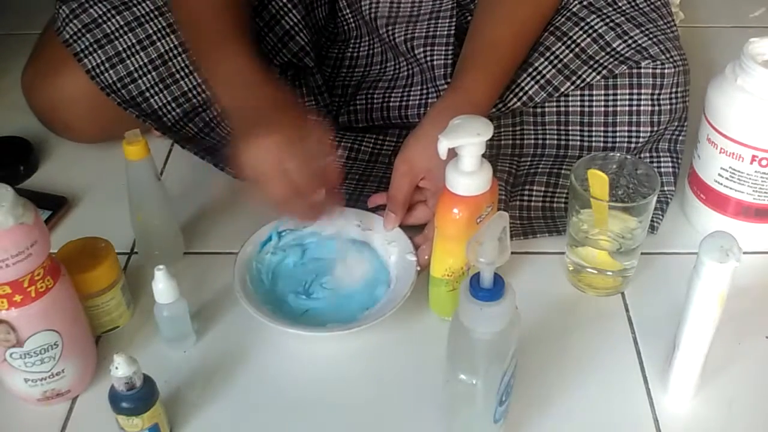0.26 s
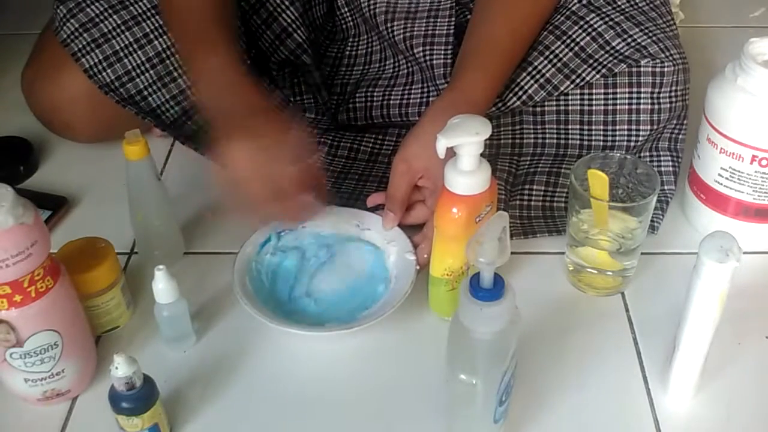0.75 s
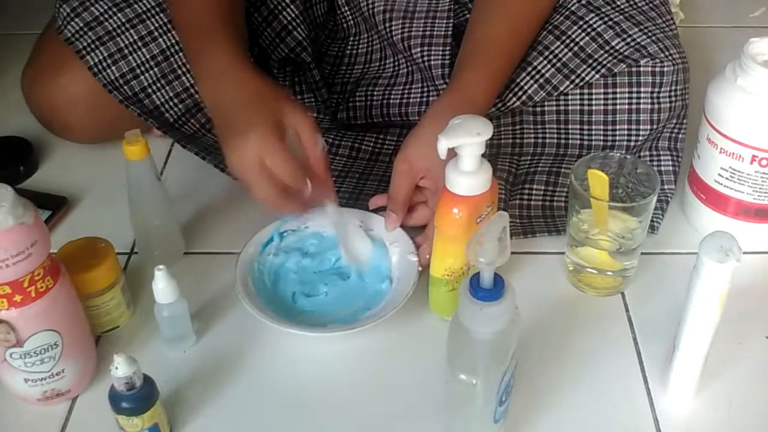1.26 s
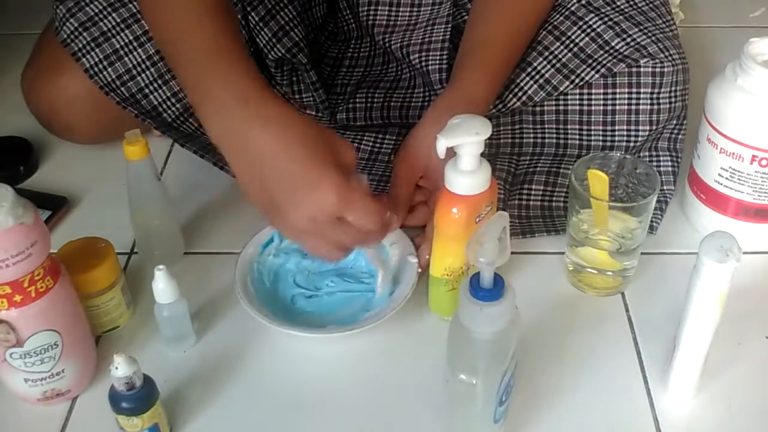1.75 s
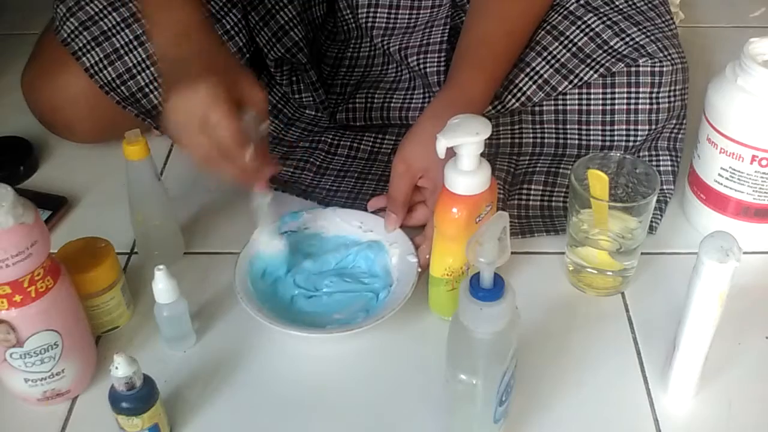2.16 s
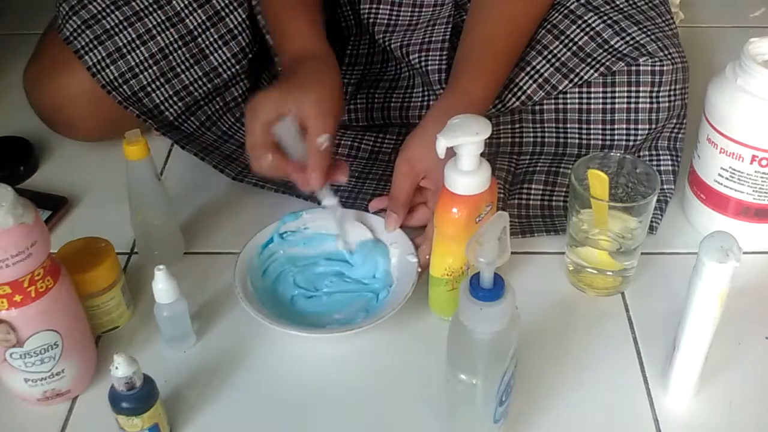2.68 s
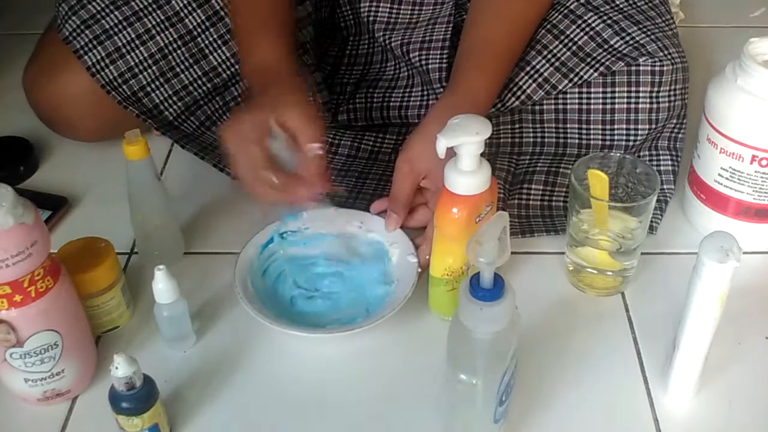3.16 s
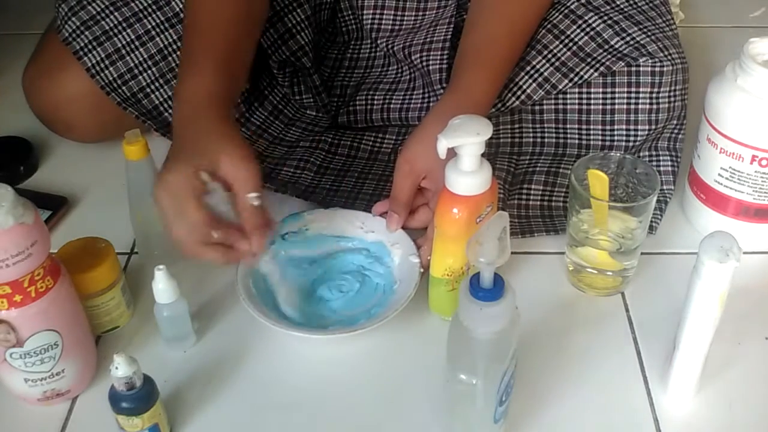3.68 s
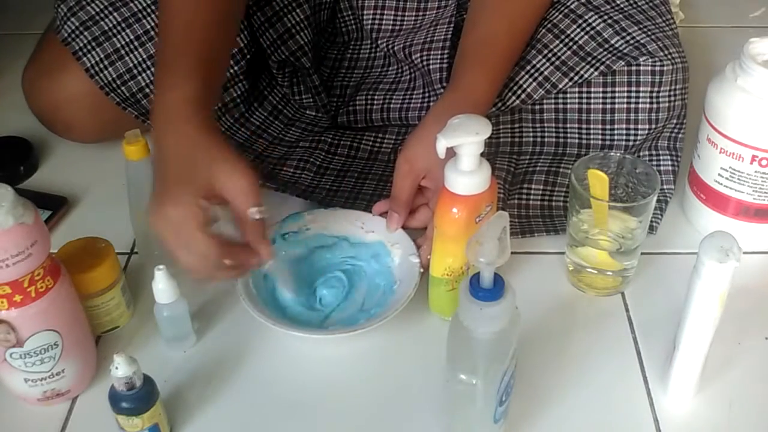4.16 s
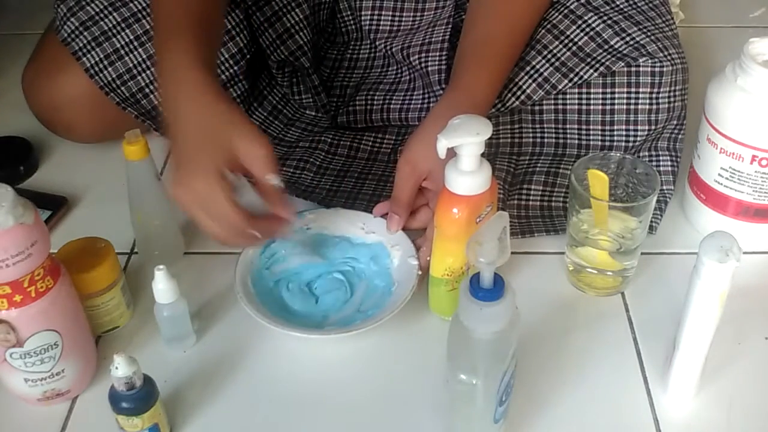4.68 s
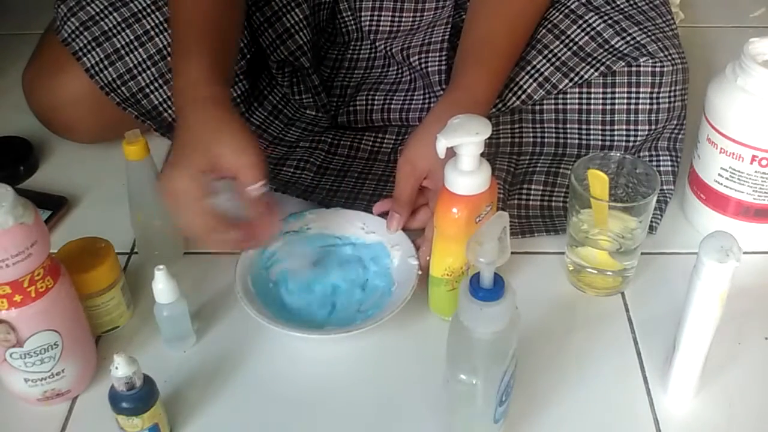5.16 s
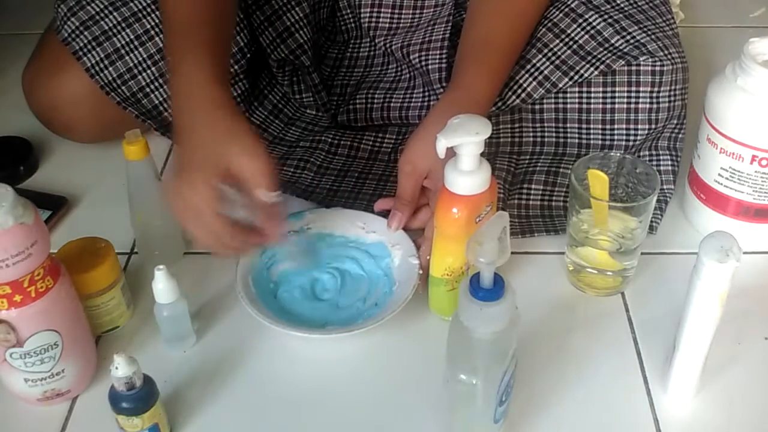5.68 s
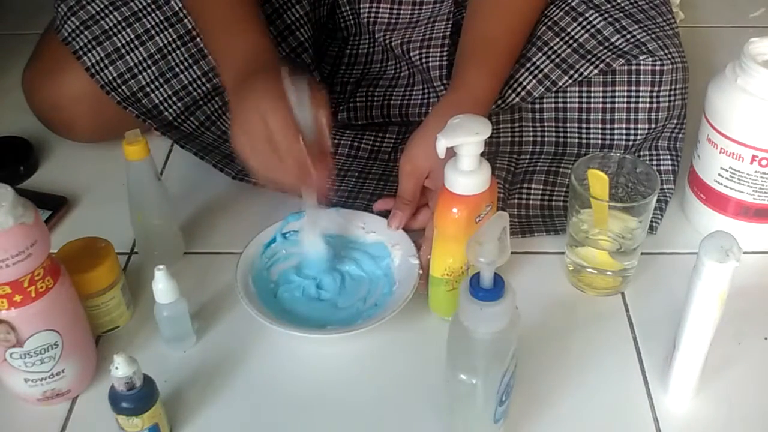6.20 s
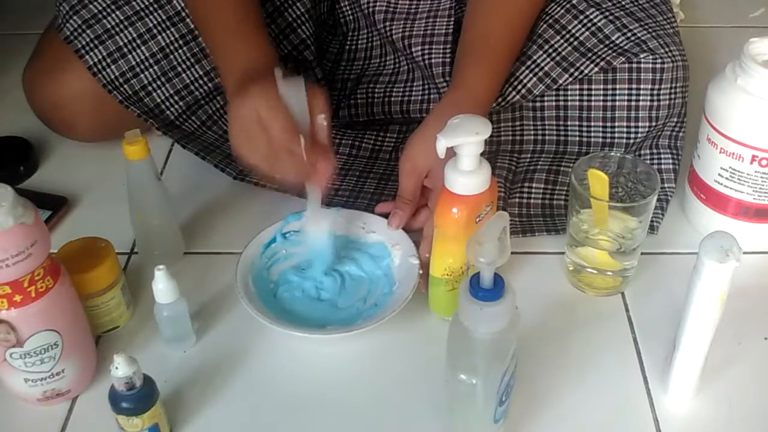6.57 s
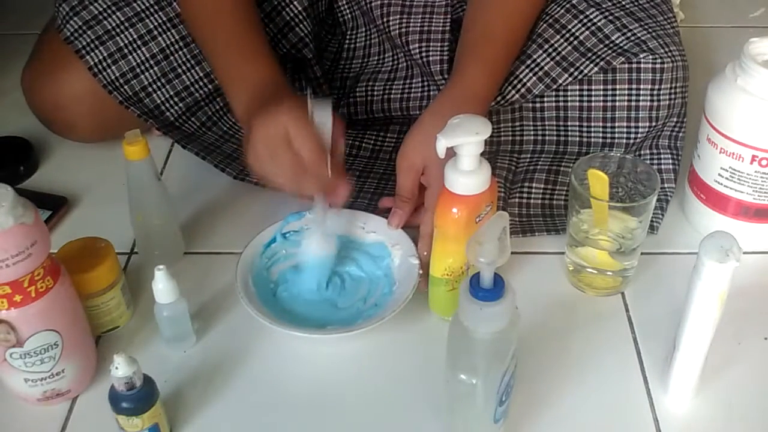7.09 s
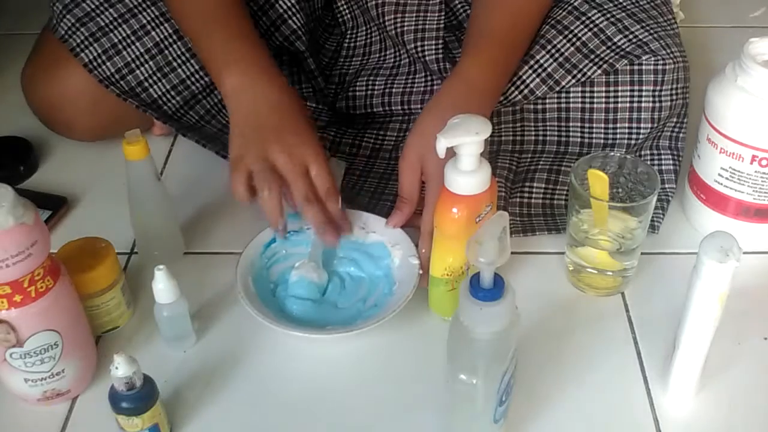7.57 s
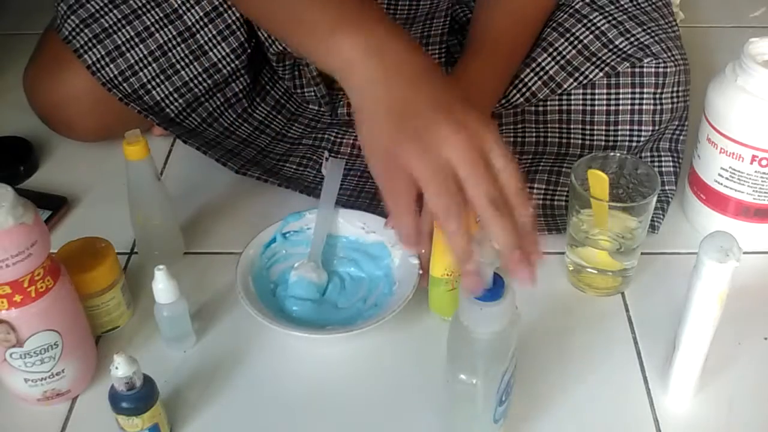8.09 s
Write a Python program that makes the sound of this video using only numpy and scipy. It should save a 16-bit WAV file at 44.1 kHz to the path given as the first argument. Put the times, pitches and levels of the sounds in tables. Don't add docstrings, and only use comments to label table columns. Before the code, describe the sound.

A plastic spoon stirs thick slime in a small ceramic-sounding bowl on a tiled floor, close to the microphone in a bare, lightly echoing room. From 0 to 0.8 s sharp, bright knocks come irregularly, the loudest at 0.3 s with a thin high ping, over sticky crackling. Faint ticks, a soft bump and quiet rubbing follow until 2.6 s, when three clear knocks ring out up to 3.1 s. Then mostly faint taps and wet drags, with one moderate knock at 4.8 s. From 5.35 to 6.7 s short, dry clacks repeat evenly, about five per second, with slight smacking. A weak tap and bump fall at 7 s, then dull floor bumps at 7.6, 7.7 and 8.1 s. Throughout, distant traffic murmurs, low engine throbs swell and fade, and hiss drifts; a faint motor passes and slows between 2 and 5.5 s.

```python
import sys
import numpy as np
from scipy import signal
from scipy.fft import rfft, irfft
from scipy.io import wavfile

SR = 44100
rng = np.random.default_rng(int(sys.argv[2]) if len(sys.argv) > 2 else 0)


def field_ratio(decibels):
    return 10 ** (np.asarray(decibels, dtype=float) / 20)


def generate_wav(signal):
    frames = np.transpose(np.atleast_2d(signal))
    scaled = np.clip(frames, -1, 1) * 32767
    pcm = np.round(scaled).astype(np.int16)
    wavfile.write(sys.argv[1], SR, pcm)


N = 367794
LEAD = SR // 4


# start in seconds, click, wall, rim and crack levels in dB.
WALL_KNOCKS = [(0.0712, -22.5, -27, -24.5, -31.5), (0.3123, -13, -20.5, -14, -16.5),
               (0.5274, -45.5, -29.5, -28, -31), (0.5326, -19.5, -55, -54, -39),
               (0.6586, -31.5, -34, -37.5, -59), (0.7492, -31.5, -37, -41.5, -77),
               (2.627, -26.5, -34.5, -37, -43), (2.8442, -52, -35.5, -34.5, -54.5),
               (2.853, -21, -31.5, -24, -30), (3.0768, -43.5, -45.5, -59, -75),
               (4.8378, -25.5, -33, -34, -42), (6.9646, -40, -50, -46, -45), (6.994, -48.5, -80, -54, -49)]
# click, wall, rim and crack levels in dB.
EARLIER_KNOCK_DB = (-29, -33.5, -34.5, -40.5)
# frequency in Hz, level in dB.
CLICK_SPECTRUM = [(700, -28.5), (1300, -11), (2000, 0.5), (2700, 4), (3300, -3), (4500, -22), (7000, -48)]
CRACK_SPECTRUM = [(2300, -23.5), (3300, 1.5), (4000, 5), (5000, 2.5), (6000, -0.5), (7200, -10.5),
                  (8500, -19.5), (12000, -38), (16000, -52)]
# frequency in Hz, level in dB, t60 in seconds.
BOTTOM_MODES = [(497, -10.5, 0.044), (672, -4, 0.06), (757, -3.5, 0.041), (869.5, -0.5, 0.042),
                (980, -2.5, 0.048), (1121, -3.5, .04)]
WALL_MODES = [(1260, -9, 0.052), (1398, -0.5, .035), (1553, 0, 0.029), (1700, -3, 0.049),
              (1760, -2.5, 0.052), (1870, -5, 0.043), (2068, -2.5, 0.033), (2284, -3, 0.017),
              (2745, -3.5, 0.021), (3080, -7, 0.0095)]
RIM_MODES = [(3497, 0, .055), (3570, -10, .03)]


def wall_knocks():
    earlier_s = -0.03
    bottom_at_db, bottom_follows = -42.5, 0.93
    rows = []
    for s, click_db, *rest_db in [(earlier_s, *EARLIER_KNOCK_DB), *WALL_KNOCKS]:
        bottom_db = bottom_at_db + bottom_follows * (click_db + 27)
        rows.append((s, click_db, bottom_db, *rest_db))
    return strike(rows, click=CLICK_SPECTRUM, bottom=BOTTOM_MODES, wall=WALL_MODES,
                  rim=RIM_MODES, crack=CRACK_SPECTRUM)


# start in seconds, click, bottom, wall and crack levels in dB.
BOTTOM_TAPS = [(3.5296, -60, -58.5, -63, -73.5), (4.5162, -58, -53, -58.5, -80.5),
               (5.3497, -38.5, -38.5, -39.5, -30.5), (5.53, -24.5, -32.5, -33.5, -20),
               (5.7198, -29.5, -35.5, -36, -20), (5.9126, -25, -38.5, -33.5, -16.5),
               (6.0915, -29.5, -35.5, -36.5, -21.5), (6.279, -25, -37, -31.5, -19),
               (6.4559, -18, -44.5, -33, -20), (6.6761, -33, -57, -38.5, -40.5)]
# frequency in Hz, level in dB, t60 in seconds.
THUD_MODES = [(410, 0.00081, 0.026), (488, 0.0061, 0.09)]
HELD_BOTTOM_MODES = [(678, -10.5, 0.079), (775, 0.5, 0.027), (857, 0, 0.037), (925, 2, 0.023),
                     (1057, -1.5, 0.031)]
HELD_WALL_MODES = [(1241, -10, 0.071), (1386, -1.5, 0.022), (1494, 2.5, 0.028), (1576, 0.5, 0.031),
                   (1590, 6, 0.026), (1894, -6.5, 0.016), (2277, -1.5, 0.021)]


def bottom_taps():
    thud_under_db = -16
    rows = [(s, click_db, bottom_db + thud_under_db, bottom_db, *rest_db)
            for s, click_db, bottom_db, *rest_db in BOTTOM_TAPS]
    return strike(rows, click=CLICK_SPECTRUM, thud=THUD_MODES, bottom=HELD_BOTTOM_MODES,
                  wall=HELD_WALL_MODES, crack=CRACK_SPECTRUM)


# start in seconds, edge and top levels in dB.
GLAZE_PINGS = [(0.0692, -51, -82), (0.3127, -24.5, -37), (2.8534, -53.5, -81), (6.9646, -41, -62),
               (6.993, -46, -68)]
# start in seconds, tip, rim and crack levels in dB.
TIP_TICKS = [(0.609, -43, -57, -37), (0.8779, -65, -73, -68), (1.07, -40, -53.5, -52),
             (2.5441, -70.5, -89, -76), (3.3044, -70, -67, -61), (3.9893, -69, -90, -77),
             (4.808, -63, -65, -52)]
# frequency in Hz, level in dB, t60 in seconds.
EDGE_MODES = [(5050, -9.5, 0.018), (5815, -6, 0.025), (5820, 0.5, 0.054), (5950, -5, 0.018),
              (7426, -6, 0.011), (8000, -17.5, 0.017)]
TOP_MODES = [(10800, -3, .012), (11300, -1.5, 0.013), (11200, -4, 0.011)]
TIP_MODES = [(4520, -29, 0.003), (4840, -7, 0.01), (5500, -2, .008), (5850, -2, 0.016), (6320, 1, 0.0076),
             (6360, 2, 0.0095), (7455, -13, 0.007), (8600, -9, 0.0067), (9300, -18, .01)]


def pings_and_ticks():
    pings = strike(GLAZE_PINGS, edge=EDGE_MODES, top=TOP_MODES)
    return pings + strike(TIP_TICKS, tip=TIP_MODES, rim=RIM_MODES, crack=CRACK_SPECTRUM)


def knocks():
    contacts = wall_knocks() + bottom_taps() + pings_and_ticks()
    return signal.sosfilt(signal.butter(2, 280, "high", fs=SR, output="sos"), contacts)


PART_TRIM_DB = dict(click=3.5, bottom=6, wall=0.5, rim=-1.5, edge=-1.5, tip=1.5, thud=1.5, top=1, crack=0.5)


def strike(rows, **parts):
    out, t = np.zeros(N + LEAD), np.arange(SR // 8) / SR
    fade = np.hanning(2 * len(t))[len(t):]
    for s, *levels_db in rows:
        start = round(s * SR) + LEAD
        phase = contact_phase(t)
        for level_db, (name, part) in zip(levels_db, parts.items()):
            sound = pulse(part, phase, t) if name in ("click", "crack") else modes(part, t)
            out[start:start + len(t)] += field_ratio(level_db + PART_TRIM_DB[name]) * sound * fade
    return out


def contact_phase(t):
    min_delay_s, smear_s = 0.0005, 0.0022
    hz = np.fft.rfftfreq(len(t), 1 / SR)
    delay_s = min_delay_s + smear_s * np.interp(hz, np.linspace(0, 12000, 9), rng.random(9))
    return 2 * np.pi * (np.cumsum(delay_s) * hz[1] + rng.random())


def pulse(spectrum, phase, t):
    hz = np.fft.rfftfreq(len(t), 1 / SR)
    burst = irfft(field_ratio(at_hz(spectrum, hz)) * np.exp(-1j * phase), len(t))
    return burst / np.abs(burst).max()


def modes(part, t):
    hz, level_db, t60_s = np.transpose(part)[:, :, None]
    spread_db = 2.1 * rng.standard_normal(hz.shape)
    phase = 2 * np.pi * rng.random(hz.shape)
    swell = (1 - np.exp(-t * hz / 0.27)) ** 2
    envelope = field_ratio(level_db + spread_db - 60 * t / t60_s) * swell
    return np.sum(envelope * np.sin(2 * np.pi * hz * t + phase), axis=0)


# start in seconds, peak in dB, pitch in Hz.
DULL_BUMPS = [(1.08, -61, 622), (1.135, -62.5, 570), (5.349, -44, 300), (6.964, -42, 805),
              (7.555, -46, 447), (7.574, -46, 272), (7.721, -42.5, 269), (7.74, -43.5, 365),
              (8.122, -46.5, 670), (8.123, -47, 332)]
# ratio to pitch, level in dB.
BUMP_MODES = [(.93, -3), (1, 1), (1.5, -9), (2.1, -12)]


def bumps():
    out, t = np.zeros(N + LEAD), np.arange(SR // 8) / SR
    for s, level_db, pitch_hz in DULL_BUMPS:
        start = round(s * SR) + LEAD
        part = [(pitch_hz * ratio, level_db + db, 0.04) for ratio, db in BUMP_MODES]
        out[start:start + len(t)] += modes(part, t)
    return out


# start in seconds, length in seconds, level in dB, centre in Hz, width in octaves.
SLIME_RUBS = [(1.079, 0.086, -72, 1960, 0.21), (1.78, 0.095, -68.5, 1044, 0.19),
              (3.254, 0.063, -74, 5940, 0.99), (3.379, 0.053, -70, 850, 0.19),
              (3.47, 0.084, -70.5, 5000, 1.3), (4.115, 0.087, -69, 4200, 1.6), (4.174, 0.1, -69, 2460, 1.2),
              (4.161, 0.15, -70.5, 1020, 0.25), (4.726, 0.2, -64, 2462, 1.5),
              (5.51, 0.022, -82, 5500, 0.99), (7.561, 0.036, -68.5, 3000, 3.5)]


def rubs():
    out = np.zeros(N + LEAD)
    for s, length_s, level_db, centre_hz, octaves in SLIME_RUBS:
        size, start = round(length_s * SR), round(s * SR) + LEAD
        lumpy = (rng.standard_normal(SR // 2) * rng.exponential(1, SR // 2))[:size]
        edges_hz = centre_hz * 2 ** (octaves * np.array([-0.5, 0.5]))
        band = signal.sosfilt(signal.butter(2, edges_hz, "band", fs=SR, output="sos"), lumpy)
        out[start:start + size] += field_ratio(level_db) * rms_one(band) * np.hanning(size)
    return out


# frequency in Hz, t60 in seconds, tail level in dB.
ROOM_DECAY = [(300, 0.2, -27), (770, 0.64, -37), (1600, 0.6, -32.5), (2400, .55, -34.5),
              (3400, 0.49, -37.5), (5500, 0.33, -33), (11095, 0.12, -28.5)]
# delay in seconds, level in dB.
EARLY_ECHOES = [(.0035, -10), (.016, -17)]


def room(x):
    t = np.arange(int(0.8 * SR)) / SR
    edges_hz = 150 * 2 ** np.arange(0, 7, 0.5)
    response = np.zeros(len(t))
    white = rng.standard_normal((2, len(t)))
    for k, (low, high) in enumerate(zip(edges_hz, edges_hz[1:])):
        band = signal.sosfilt(signal.butter(2, [low, high], "band", fs=SR, output="sos"), white[k % 2])
        hz = np.sqrt(low * high)
        decay_db = at_hz(ROOM_DECAY, hz, column=2) - 60 * t / at_hz(ROOM_DECAY, hz)
        response += band * field_ratio(decay_db)
    response *= 1 - np.exp(-t / 0.0016)
    response[0] = 1
    for delay_s, level_db in EARLY_ECHOES:
        response[round(delay_s * SR)] += field_ratio(level_db)
    return signal.fftconvolve(x, response)[LEAD:LEAD + N]


# frequency in Hz, level in dB.
SMACK_SPECTRUM = [(900, -10.5), (1800, 2.5), (3000, 1.5), (5500, 0.5), (8000, -11.5), (12000, -12.5)]
# time in seconds, smack level in dB.
STIR_EFFORT = [(0, -67), (.3, -66), (.5, -58), (.7, -68.5), (1.5, -84.5), (2.3, -81.5), (2.7, -86),
               (3.0, -69.5), (3.3, -78), (3.6, -86), (4.55, -89), (4.75, -79), (5.2, -102), (5.5, -72.5),
               (6.7, -73), (7.15, -90.5), (7.33, -78.5), (7.5, -86)]


def smacks():
    pops_per_s = 2500
    sizes = field_ratio(3.0 * np.minimum(rng.exponential(1, N), 5)) * rng.choice([-1, 1], N)
    pops = sizes * (rng.random(N) < pops_per_s / SR)
    effort_db, = in_time(STIR_EFFORT)
    return field_ratio(effort_db) * rms_one(coloured(pops, SMACK_SPECTRUM))


# time in seconds, murmur level in dB.
TRAFFIC_LEVEL = [(0, -70.5), (.5, -69), (1.4, -73), (2.1, -69), (3.0, -66.5), (3.75, -67), (4.2, -70),
                 (4.8, -68.5), (5.15, -69.5), (5.45, -66), (6.5, -75.5), (7.0, -66.5), (7.4, -72),
                 (7.75, -66.5), (8.34, -76)]
# frequency in Hz, density in dB per Hz.
RUMBLE_SPECTRUM = [(13, -60.5), (22, -17.5), (29, -10.5), (35, -11), (54, 2.5), (67, 1), (86, 0),
                   (118, -3.5), (162, -2.5), (204, -17.5), (230, -25), (300, -46.5), (510, -120)]
MURMUR_SPECTRUM = [(120, -31), (200, -3), (327, -5.5), (385, -8), (449, -10), (882, -15), (1220, -25),
                   (2000, -29), (2600, -52.5), (4400, -120)]


def street(rumble_noise, murmur_noise):
    rumble_mean_db, rumble_follows = -62, 0.23
    rumble = rms_one(coloured(rumble_noise, RUMBLE_SPECTRUM))
    murmur = rms_one(coloured(murmur_noise, MURMUR_SPECTRUM))
    traffic_db, = in_time(TRAFFIC_LEVEL)
    rumble_db = rumble_mean_db + rumble_follows * (traffic_db - traffic_db.mean())
    return field_ratio(rumble_db) * rumble + field_ratio(traffic_db) * patchy(murmur)


def patchy(x):
    rustle_db = 2
    low = signal.sosfilt(signal.butter(2, 400, fs=SR, output="sos"), x)
    return field_ratio(rustle_db * wander(3000)) * low + field_ratio(rustle_db * wander(3000)) * (x - low)


# centre in seconds, length in seconds, level in dB.
ENGINE_THROBS = [(0.183, 0.068, -47.5), (0.605, .12, -61), (1.133, 0.082, -64.5), (1.32, 0.086, -56),
                 (1.887, 0.088, -60.5), (2.063, 0.12, -51.5), (2.292, .26, -51.5), (2.71, 0.14, -60),
                 (3.215, 0.12, -51), (3.547, 0.087, -62.5), (3.841, 0.19, -57), (4.133, 0.35, -53.5),
                 (4.581, 0.21, -53.5), (4.864, .16, -51.5), (5.144, 0.1, -56), (5.382, .14, -53),
                 (5.517, 0.15, -60), (5.714, 0.16, -57.5), (6.371, .1, -55.5), (6.498, 0.094, -56.5),
                 (6.775, 0.16, -55.5), (7.286, 0.11, -52.5), (7.716, 0.19, -57), (8.001, .14, -61.5),
                 (8.203, .2, -53)]


def throbs():
    throb_hz, spread_hz = 56.9, 3.0
    out = np.zeros(N + SR)
    chance = rng.standard_normal((len(ENGINE_THROBS), 2))
    for (s, length_s, level_db), (off, turn) in zip(ENGINE_THROBS, chance):
        size = round(2 * length_s * SR)
        start, t = round(s * SR) - size // 2 + LEAD, np.arange(size) / SR
        tone = np.sin(2 * np.pi * ((throb_hz + spread_hz * off) * t + turn))
        out[start:start + size] += field_ratio(level_db - 0.5) * np.hanning(size) * tone
    return out[LEAD:LEAD + N]


# time in seconds, firing rate in Hz, level in dB.
MOTOR_PASS = [
    (1.6, 90.8, -95),
    (2.0, 89.5, -77.5),
    (2.7, 90.9, -66),
    (3.3, 89.7, -72),
    (3.5, 78.94, -69.5),
    (4.7, 79.96, -74.5),
    (5.3, 78.9, -79),
    (6.0, 78.5, -100.5),
]
# multiple of the firing rate, level in dB.
FIRING_ORDERS = [(2, 3.5), (3, -6.5), (4, -9)]


def motor():
    firing_hz, level_db = in_time(MOTOR_PASS)
    wobble = wander(4096)
    phase = 2 * np.pi * np.cumsum(firing_hz * (1 + 0.0066 * wobble)) / SR
    orders = sum(field_ratio(db) * np.sin(k * phase) for k, db in FIRING_ORDERS)
    return field_ratio(level_db + 1.1 * wobble) * orders


# frequency in Hz, density in dB per Hz.
HISS_SPECTRUM = [(710, -22.5), (1200, -4), (3340, -11), (5920, -11.5), (7960, -10), (13600, -11.5),
                 (14500, -18.5), (15000, -30.5)]
# time in seconds, hiss level in dB.
GAIN_DRIFT = [(0, -80.5), (.3, -83), (.45, -71), (.8, -88), (1.15, -82), (1.5, -79), (2.2, -90), (2.6, -77),
              (3.35, -85), (3.55, -77), (4.6, -79.5), (4.75, -82.5), (5.0, -78.5), (5.7, -75), (6.62, -75),
              (6.8, -82.5), (7.4, -82), (7.6, -80)]


def recorder_hiss(noise):
    hiss = rms_one(coloured(noise, HISS_SPECTRUM))
    flicker_db = 1.0 * wander(2048)
    gain_db, = in_time(GAIN_DRIFT)
    return field_ratio(gain_db + 3.5 + flicker_db) * hiss


def at_hz(points, hz, column=1):
    table = np.array(points)
    return np.interp(np.log(np.maximum(hz, 1)), np.log(table[:, 0]), table[:, column])


def in_time(rows):
    s, *columns = np.transpose(rows)
    return [np.interp(np.arange(N) / SR, s, column) for column in columns]


def wander(step):
    count = N // step + 2
    return np.interp(np.arange(N) / step, np.arange(count), rng.standard_normal(count))


def rms_one(x):
    return x / np.sqrt(np.mean(x ** 2) + 1e-20)


def coloured(x, spectrum):
    hz = np.fft.rfftfreq(len(x), 1 / SR)
    closed = [(spectrum[0][0] * 0.7, -80), *spectrum, (spectrum[-1][0] * 1.3, -80)]
    return irfft(rfft(x) * field_ratio(at_hz(closed, hz)), len(x))


def scene():
    rumble_noise, murmur_noise, hiss_noise = rng.standard_normal((3, N))
    background = smacks() + recorder_hiss(hiss_noise) + street(rumble_noise, murmur_noise)
    mid = room(knocks() + bumps() + rubs())
    mid += background + throbs() + motor()
    return np.array([mid, mid])


def band_limit(x):
    return signal.sosfilt(signal.butter(12, 15560, fs=SR, output="sos"), x)


# frequency in Hz, share of the time.
TREBLE_WIDTH = [(3700, 0), (4500, .07), (6000, 0.2), (7500, .65), (14000, 0.8)]


def record(dry):
    round_at, cutoff_hz = 0.55, 14500
    hz, _, frames = signal.stft(dry[0], SR, nperseg=2048)
    band = (hz / 800).astype(int)
    share = at_hz(TREBLE_WIDTH, band * 800 + 400)[:, None]
    patch = rng.random((band.max() + 1, frames.shape[1]))[band] < share
    treble = np.sum(np.abs(frames[hz > 3000]) ** 2, axis=0)
    steady = treble < 4 * np.roll(treble, 1)
    side = frames * patch * steady * np.exp(2j * np.pi * rng.random(frames.shape))
    both = dry + field_ratio(-0.5) * signal.istft(side, SR, nperseg=2048)[1][:N] * [[1], [-1]]
    rounded = round_at * np.tanh(both / round_at)
    mix = signal.sosfilt(signal.cheby2(12, 30, cutoff_hz, fs=SR, output="sos"), rounded)
    return band_limit(mix)


dry = scene()
out = record(dry)
generate_wav(out)
```